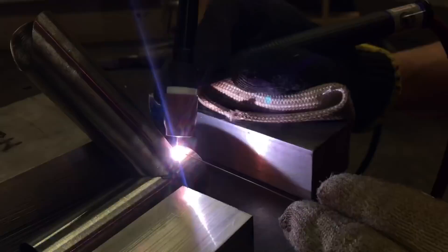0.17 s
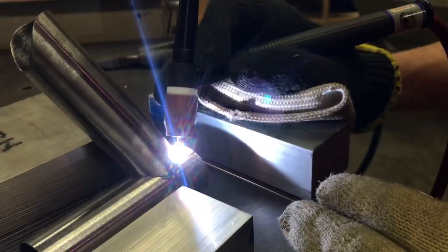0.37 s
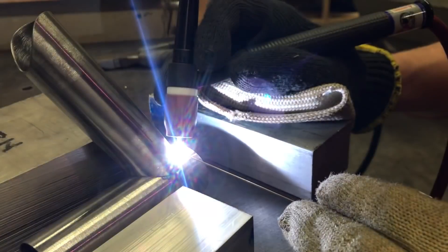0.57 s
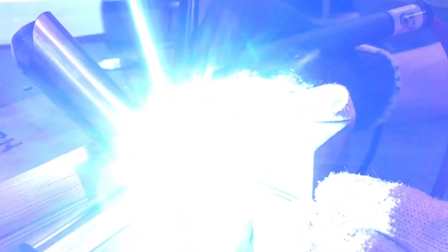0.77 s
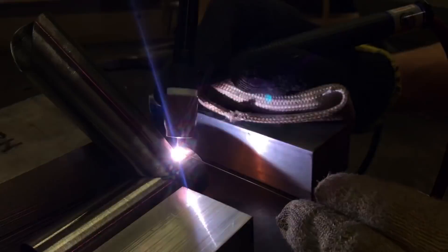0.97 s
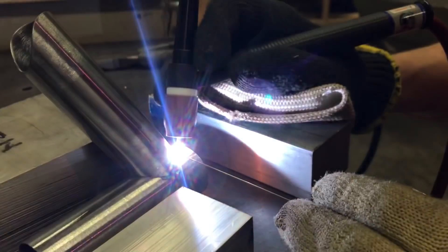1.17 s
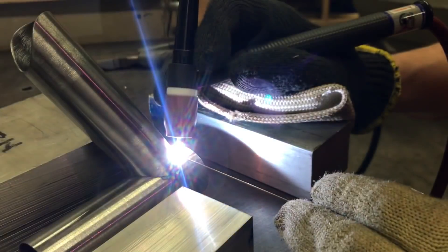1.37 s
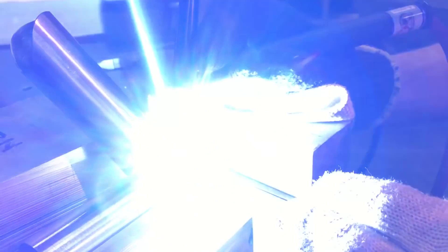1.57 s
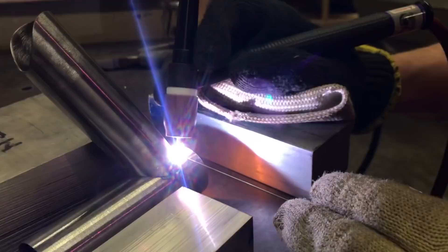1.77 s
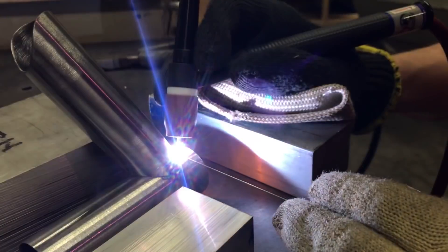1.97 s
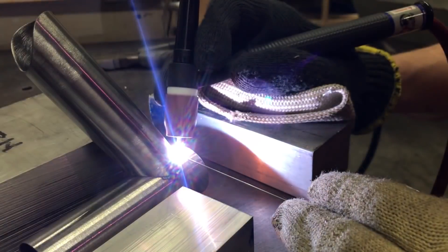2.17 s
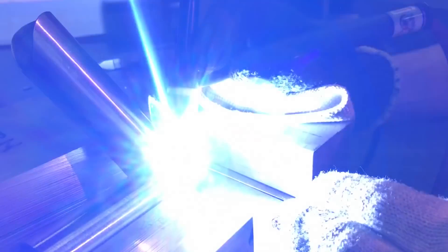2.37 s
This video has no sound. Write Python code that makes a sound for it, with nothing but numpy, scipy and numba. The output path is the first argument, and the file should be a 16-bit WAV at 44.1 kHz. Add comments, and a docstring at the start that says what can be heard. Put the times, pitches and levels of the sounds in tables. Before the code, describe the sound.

Welding arc firing four short, crackling buzzes above a steady hiss and a whining fan.

```python
"""At a welding bench, a pulsed TIG arc burns on thin steel tubing.
Shielding gas hisses, the welder's fan whines and the arc sizzles. Each pulse of current starts with
a spit of sparks and a crack, buzzes at twice the mains rate and ends with a second crack.
Every crack makes an automatic gain control turn the sound down, so hiss and whine swell back
between the pulses."""
import sys
import numpy as np
from scipy import signal
from scipy.fft import rfft, irfft, next_fast_len
from scipy.io import wavfile
from scipy.ndimage import uniform_filter1d, map_coordinates
from numba import njit

SR = 44100
rng = np.random.default_rng(int(sys.argv[2]) if len(sys.argv) > 2 else 0)


def inscribe(sig):
    """Save sig as 16-bit PCM at rate SR to the path in sys.argv[1].

    A 1-D sig is mono; a 2-D sig holds one channel per row.
    Samples are clipped to [-1, 1] before scaling.
    """
    pcm = np.round(np.clip(np.atleast_2d(sig).T, -1, 1) * 32767)
    wavfile.write(sys.argv[1], SR, pcm.astype(np.int16))


N = 105972
PULSE_S, BUZZ_HZ = 0.138, 120  # length of a pulse; twice the mains rate


def amp(db):
    """Turn decibels into a gain."""
    return 10 ** (np.asarray(db) / 20)


def unit(x):
    """Scale to an average (rms) level of 1."""
    return x / np.sqrt(np.mean(x ** 2) + 1e-20)


def colour(points):
    """Join (Hz, dB) points into a curve of gain against frequency."""
    f, db = np.transpose(points)
    return lambda hz: amp(np.interp(np.log(hz + 1), np.log(f + 1), db))


def band_limit(hz):
    """A gain curve that falls steeply above 16400 Hz."""
    return 1 / (1 + (hz / 16400) ** 100)


def filtered(x, response):
    """Shape a sound with a gain curve."""
    m = next_fast_len(len(x) + 8192)
    return irfft(rfft(x, m) * response(np.fft.rfftfreq(m, 1 / SR)), m)[:len(x)]


def noise(response, size=N):
    """Noise shaped by a gain curve, at level 1."""
    return unit(filtered(rng.standard_normal(size), response))


def wobble(rate):
    """A smooth curve through `rate` random points a second."""
    return map_coordinates(rng.standard_normal(256), [np.arange(N) * rate / SR], mode="wrap")


def add(track, s, sound):
    """Mix a sound into the track, starting at s seconds."""
    part = track[round(s * SR):][:len(sound)]
    part += sound[:len(part)]


def pulse_gate():
    """The times within a pulse, and a gain that fades it in and out over 1 ms."""
    t = np.arange(int(PULSE_S * SR)) / SR
    return t, np.clip(np.minimum(t, PULSE_S - t) / 0.001, 0, 1)


# The tone of the rushing gas. Each row: frequency in Hz, level in dB.
GAS_COLOUR = [(15, -38), (30, -11), (58, 1), (85, -1), (120, -7), (190, -3.5), (250, -5.5), (300, -3.5),
              (450, -7), (700, -5.5), (1000, -7), (1400, -8), (2000, -12), (3200, -13.5), (4300, -14.5),
              (4850, -18.5), (5300, -17), (7400, -25.5), (9500, -25.5), (10400, -31), (11500, -27.5),
              (15700, -30), (16200, -55)]


def gas(level_db=-27.5, patchy_db=1.34):
    """Shielding gas and cooling air make a steady, slightly patchy rush."""
    spectrum = signal.stft(rng.standard_normal(N), nperseg=512)[2]
    patches = uniform_filter1d(rng.standard_normal(spectrum.shape), size=6, axis=0)  # blur in pitch
    patches = uniform_filter1d(patches, size=10, axis=1)  # and in time
    rush = signal.istft(spectrum * amp(patchy_db * unit(patches)), nperseg=512)[1][:N]
    return amp(level_db) * unit(filtered(rush, colour(GAS_COLOUR)))


# The fan's whine. Each row: multiple of the blade pitch, level in dB.
BLADE_TONES = [(1, -27), (3, -41.5), (5, -54), (7, -55.5), (8, -49)]
# Resonances of the fan's housing. Each row: frequency in Hz, width in Hz, level in dB.
HOUSING_RESONANCES = [(241.5, 12.7, -35), (384, 15, -42.5), (633, 11, -47.5), (830, 4.5, -44.5),
                      (1153, 8.7, -44.5), (1323, 13, -43), (1547, 6.1, -44.5), (1960, 16, -54)]


def fan(blade_hz=332.5, wander=0.001865, flicker_db=1.2):
    """The spinning blades whine, and their air stream makes the housing resonate."""
    turns = np.cumsum(blade_hz * (1 + wander * wobble(12))) / SR
    whine = 0
    for multiple, db in BLADE_TONES:
        level = amp(db - flicker_db * wobble(15)) * np.sqrt(2)
        whine += level * np.sin(2 * np.pi * (multiple * turns + rng.random()))
    air = sum(amp(db) * noise(lambda f: 1 / (1 + ((f - hz) / width) ** 2))
              for hz, width, db in HOUSING_RESONANCES)
    return whine + air


# The tone of the sizzle. Each row: frequency in Hz, level in dB.
SIZZLE_COLOUR = [(1500, -34), (3500, 1.5), (4800, -6.5), (5300, -1.5), (6400, -7), (8200, 0.5), (8900, -8),
                 (9600, -2), (10400, -8.5), (11500, -6.5), (12400, -10), (14000, 6), (15000, -3),
                 (15700, -3), (16200, -30)]


def sizzle(low_current_db=-49.5):
    """The arc sizzles in time with the mains ripple, louder and more evenly during a pulse."""
    _, gate = pulse_gate()
    rise_db = np.zeros(N)
    for start, _, delay, *_, sizzle_db, _ in PULSE_STARTS:
        add(rise_db, start + delay, sizzle_db * gate)
    ripple = 1 + 0.8 * amp(-rise_db / 2) * np.sin(2 * np.pi * BUZZ_HZ * np.arange(N) / SR)
    return amp(low_current_db + rise_db) * ripple * noise(colour(SIZZLE_COLOUR))


# The tone of sparks and cracks. Each row: frequency in Hz, level in dB.
DISCHARGE_COLOUR = [(200, -4), (1000, 14), (2000, 0), (3300, 9), (6000, 2.5), (8000, 6.5), (11500, -9.5),
                    (14500, 4.5), (17000, -1)]
CRACK_FADE_S = 0.00051


def sparks(envelope, drive=1.4):
    """An electric discharge spits a dense burst of noise, with a peak of 1."""
    burst = np.tanh(drive * envelope * noise(colour(DISCHARGE_COLOUR), size=len(envelope)))
    burst = filtered(burst, band_limit)
    return burst / np.abs(burst).max()


def crack(t, bass_lag_s=0.000402):
    """A sharp pressure wave arrives treble first and trails spark noise, with a peak of 1."""
    size = len(t)
    hz = np.fft.rfftfreq(size, 1 / SR)
    lag = bass_lag_s * (1 - hz / (SR / 2)) ** 2
    phase = 2 * np.pi * np.cumsum(lag) * SR / size
    spectrum = colour(DISCHARGE_COLOUR)(hz) * band_limit(hz) * np.exp(-1j * phase)
    front = irfft(spectrum, size) * (t < t[-1] / 2)
    both = front / np.abs(front).max() + 0.56 * sparks(np.exp(-t / CRACK_FADE_S))
    return both / np.abs(both).max()


# The tube's ring. Each row: pitch in Hz, level in dB relative to the crack, seconds to fade by 60 dB.
TUBE_RING = [(5850, -28, 0.032), (14300, -33, 0.047)]


def current_step(crack_db, thump_db, knock_db, knock_hz=984, knock_s=0.009):
    """The arc jumps in size: a crack, a short knock, a diving thump and a faint ring of the tube."""
    t = np.arange(SR // 10) / SR
    turns = 0.4744 * np.log1p(t / 0.000083) + 26 * t  # the pitch dives towards 26 Hz
    thump = np.sin(2 * np.pi * turns) * np.exp(-t / 0.013 - (t / 0.049) ** 4)  # gone in about 50 ms
    knock = np.sin(2 * np.pi * knock_hz * t) * amp(-60 * t / knock_s)
    ring = sum(amp(db - 60 * t / fade_s) * np.sin(2 * np.pi * hz * t) for hz, db, fade_s in TUBE_RING)
    fade_in = 1 - np.exp(-(t / CRACK_FADE_S) ** 2)
    return amp(crack_db) * (crack(t) + ring) + fade_in * (amp(thump_db) * thump + amp(knock_db) * knock)


# The current jumps up. Each row: start in seconds, spark level in dB, delay of the crack in seconds,
# crack, thump and knock levels in dB, treble limit in Hz, sizzle boost in dB, buzz boost in dB.
PULSE_STARTS = [(0.099, -9, 0.0066, 11, -27, -9, 15200, 13.5, 16.5),
                (.8520, -7.5, .0061, 11.5, 9, 3, 19000, 21.5, 12.5),
                (1.6044, -3.5, .0056, 5.5, 13, -12, 19000, 19, 22),
                (2.3558, -1.5, .0058, 6.5, 14.5, 6, 10700, 18, 22)]


def opening_cracks(spark_s=0.00075, spark_fade_s=0.00045):
    """Each pulse opens with a spit of sparks, then a crack as the current rises."""
    out, t = np.zeros(N), np.arange(SR // 5) / SR
    for start, spark_db, delay, crack_db, thump_db, knock_db, top_hz, *_ in PULSE_STARTS:
        strike = amp(spark_db) * sparks(np.exp(-np.maximum(t - spark_s, 0) / spark_fade_s))
        add(strike, delay, -current_step(crack_db, thump_db, knock_db))
        add(out, start, filtered(strike, lambda hz: 1 / np.sqrt(1 + (hz / top_hz) ** 10)))
    return out


# The arc's buzz. Each row: multiple of BUZZ_HZ, level in dB before the pulse's boost.
BUZZ_TONES = [(1, -41.5), (2, -41.5), (3, -43.5), (4, -46.5), (5, -49.5), (6, -58), (7, -54), (8, -53)]
# The tone of the stirred gas. Each row: frequency in Hz, level in dB.
FLUTTER_COLOUR = [(15, -1), (38, -4), (75, 6), (150, -11.5), (400, -18.5), (1000, -26), (3000, -36),
                  (16000, -85)]


def buzz_and_flutter(flutter_db=-15.5, surge_db=14, settle_s=0.018):
    """At high current the hot arc buzzes and stirs the gas, hardest as the pulse begins."""
    out = np.zeros(N)
    t, gate = pulse_gate()
    stirring = amp(flutter_db + surge_db * np.exp(-t / settle_s))
    for start, _, delay, *_, buzz_db in PULSE_STARTS:
        buzz = sum(amp(db) * np.sqrt(2) * np.sin(2 * np.pi * (k * BUZZ_HZ * t + 0.5 * rng.random()))
                   for k, db in BUZZ_TONES)
        flutter = stirring * noise(colour(FLUTTER_COLOUR), size=SR)[:len(t)]
        add(out, start + delay, gate * (amp(buzz_db) * buzz + flutter))
    return out


# The current drops back. Each row: start in seconds, then crack, thump and knock levels in dB.
PULSE_ENDS = [(0.2431, 9.5, 8.5, 8), (.9960, 10, 1.5, 8), (1.7475, 9.5, 11, 11.5)]


def closing_cracks():
    """The falling current ends a pulse with a crack that pushes the air the opposite way."""
    out = np.zeros(N)
    for start, crack_db, thump_db, knock_db in PULSE_ENDS:
        add(out, start, current_step(crack_db, thump_db, knock_db))
    return out


def scene():
    """All the sounds together, in one channel."""
    return (opening_cracks() + closing_cracks() + buzz_and_flutter() + sizzle() + gas() + fan())[None]


@njit
def ducking(over_db, hold, recover, soften):
    """How many dB to turn down: jump at once, hold, then ease back (times in samples)."""
    cut = np.zeros(len(over_db))
    held, smooth, wait = 0., 0., 0.
    for i in range(len(over_db)):
        wait -= 1
        if wait < 0:
            held -= held / recover
        smooth += (held - smooth) / soften
        if over_db[i] > held:
            held, wait = over_db[i], hold
        smooth = max(smooth, held)
        cut[i] = smooth
    return cut


CEILING_DB, CLIP_DB = -7, -8  # where turning down begins; where peaks are flattened
ATTACK_S, HOLD_S, RECOVER_S, SOFTEN_S = 0.00013, 0.085, 0.11, 0.065


def record(dry):
    """Gain control turns loud peaks down; what slips past is clipped, and the top treble is cut."""
    over_db = np.maximum(20 * np.log10(np.abs(dry[0]) + 1e-9) - CEILING_DB, 0)
    cut_db = ducking(over_db, HOLD_S * SR, RECOVER_S * SR, SOFTEN_S * SR)
    lag = np.exp(-1 / (ATTACK_S * SR))
    cut_db = signal.lfilter([1 - lag], [1, -lag], cut_db)  # it reacts a little late
    ducked = dry[0] * amp(-cut_db)
    clipped = ducked / (1 + (ducked / amp(CLIP_DB)) ** 10) ** (1 / 10)
    return filtered(clipped, band_limit)[None]


dry = scene()
out = record(dry)
inscribe(out)
```